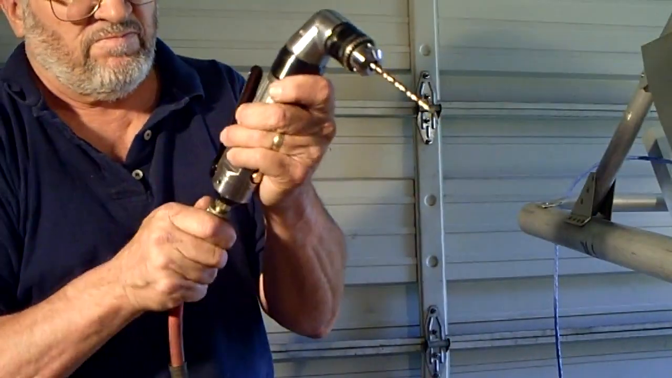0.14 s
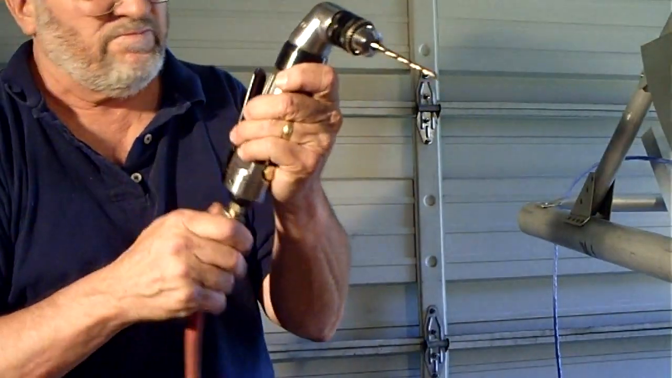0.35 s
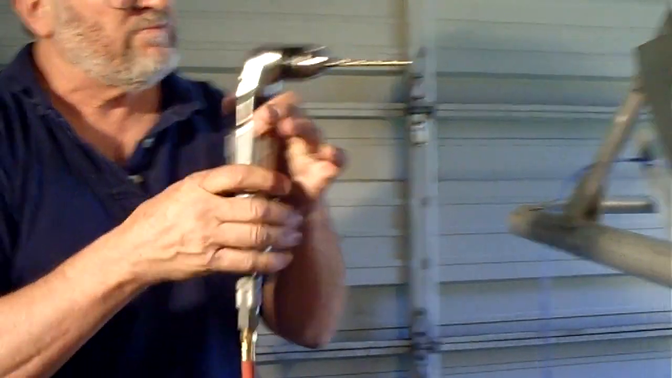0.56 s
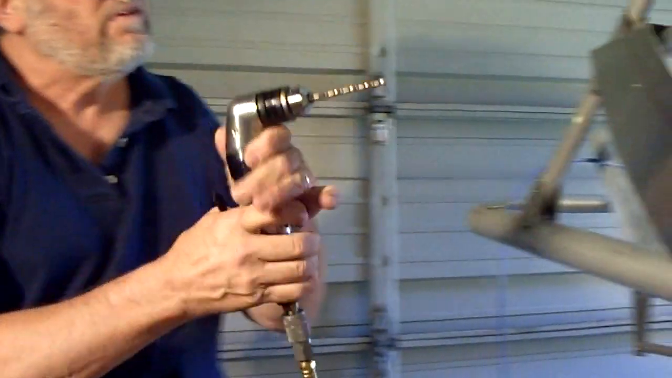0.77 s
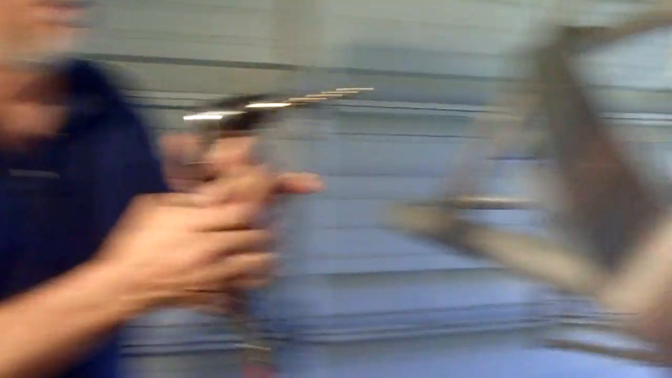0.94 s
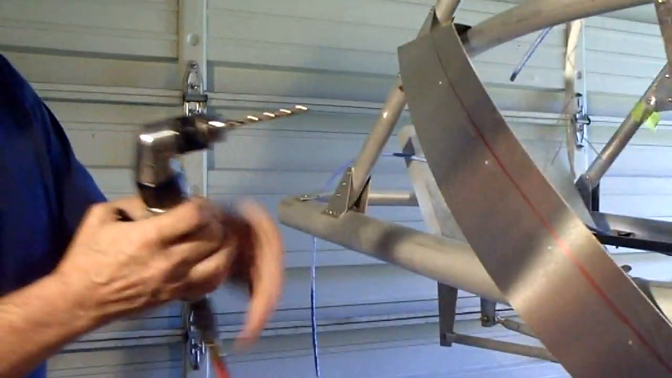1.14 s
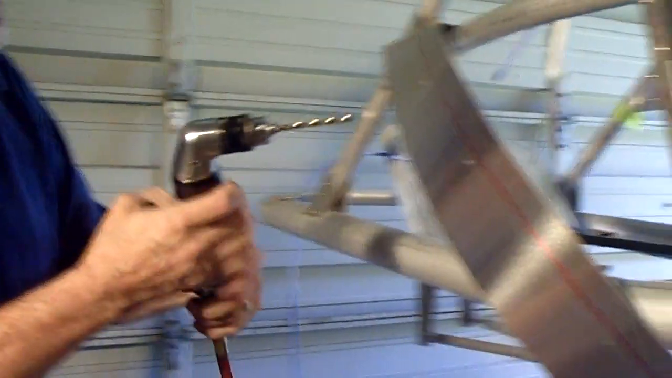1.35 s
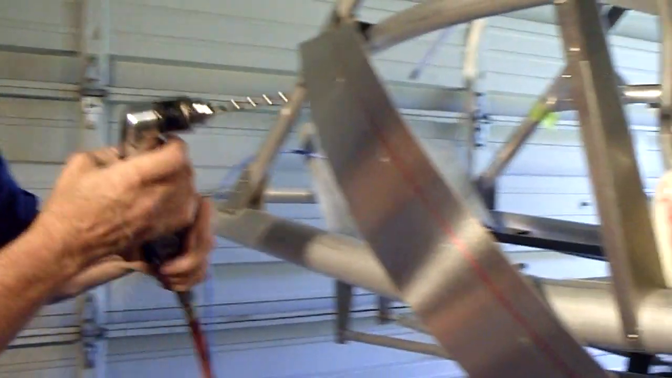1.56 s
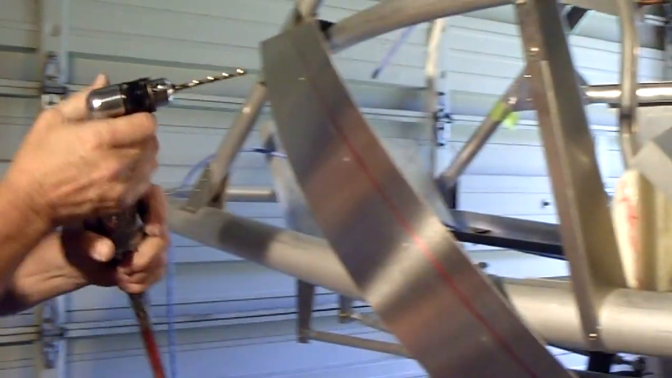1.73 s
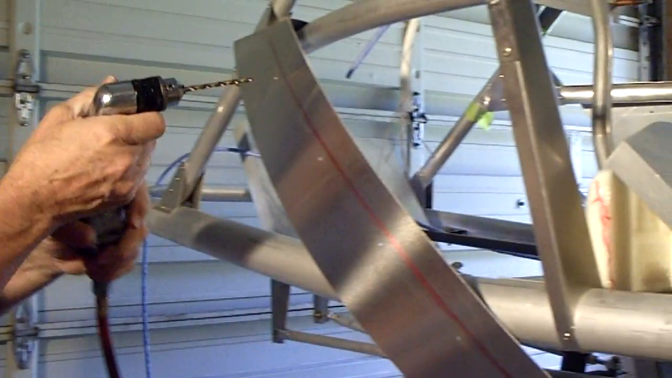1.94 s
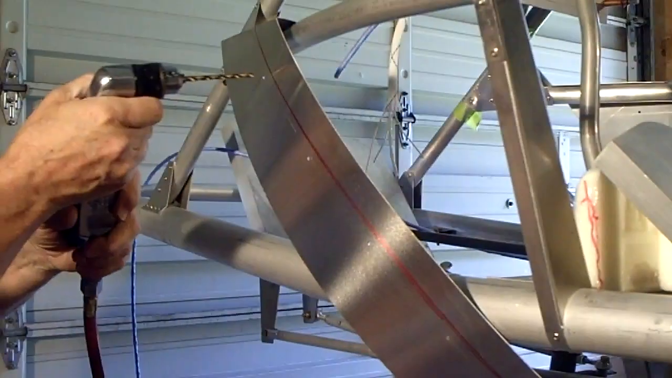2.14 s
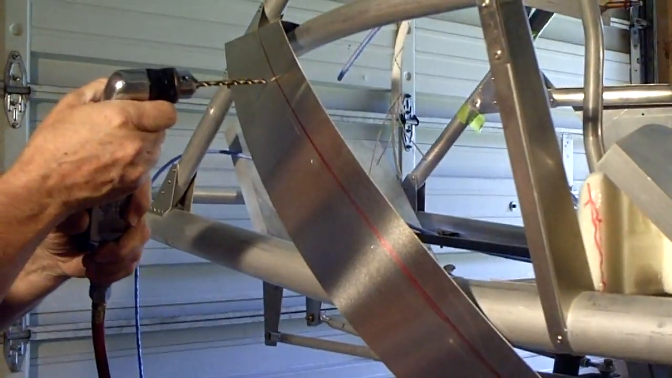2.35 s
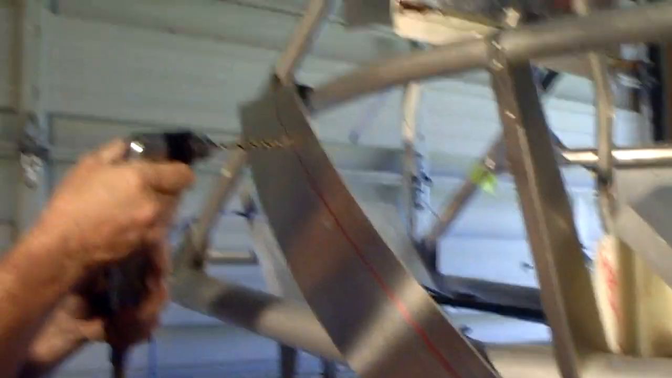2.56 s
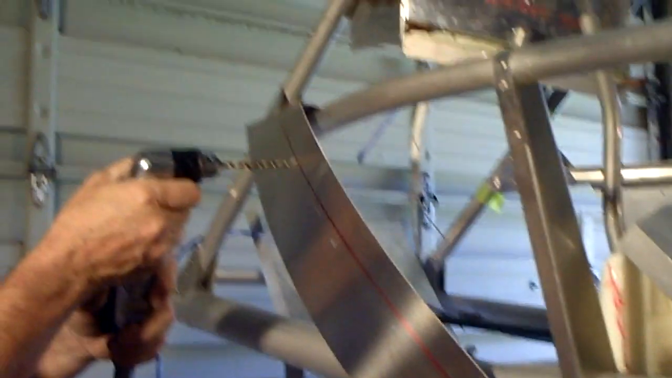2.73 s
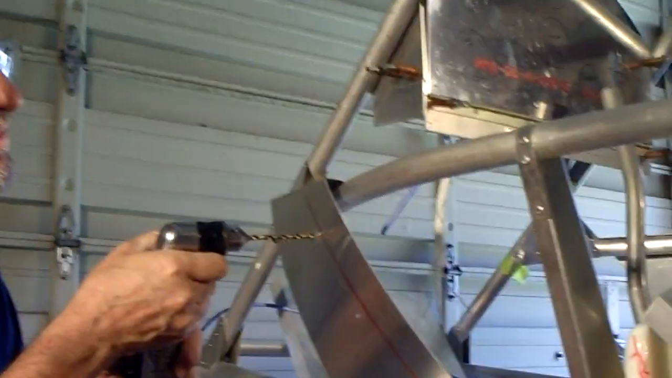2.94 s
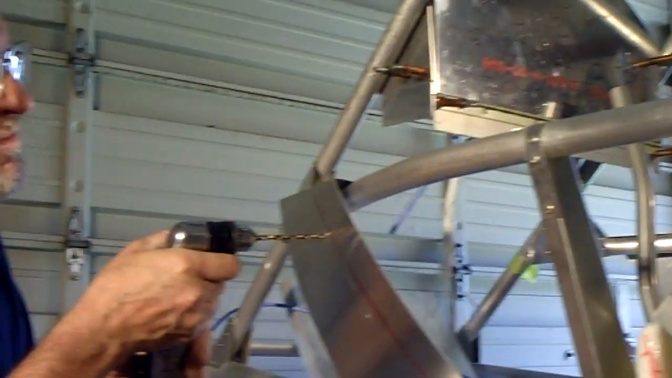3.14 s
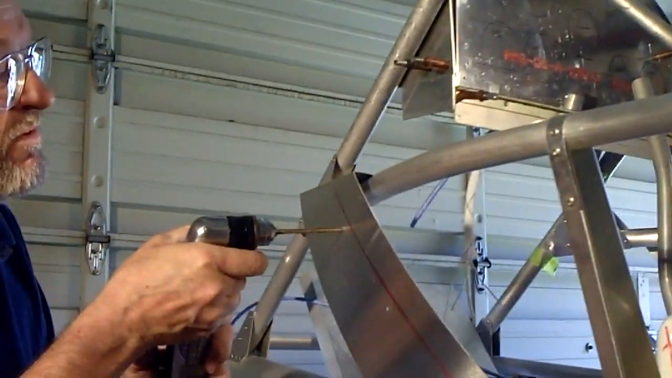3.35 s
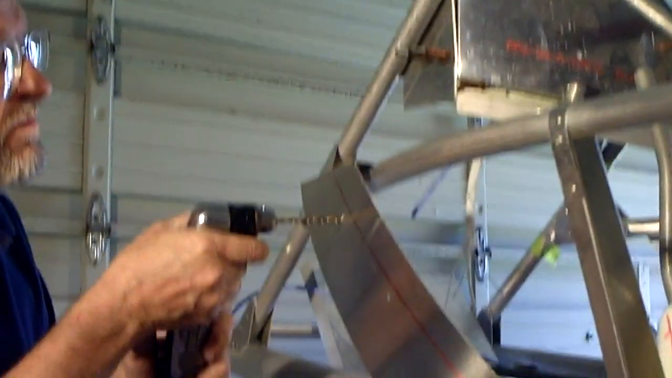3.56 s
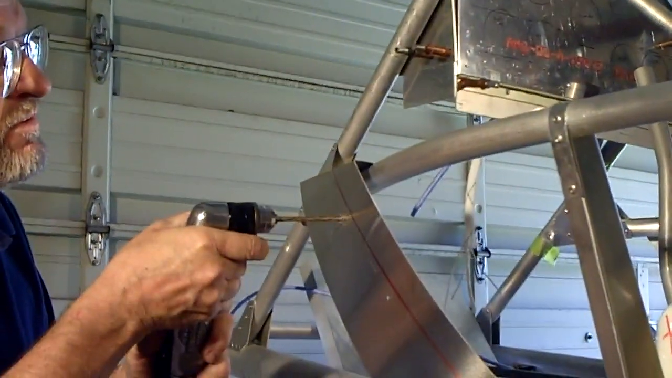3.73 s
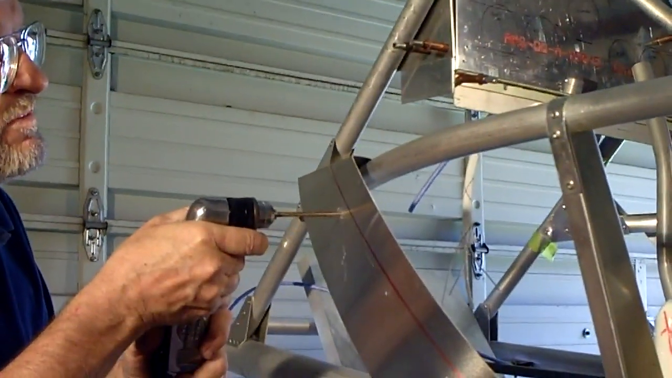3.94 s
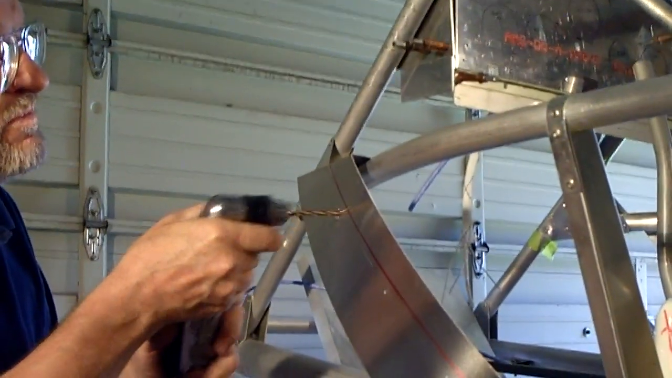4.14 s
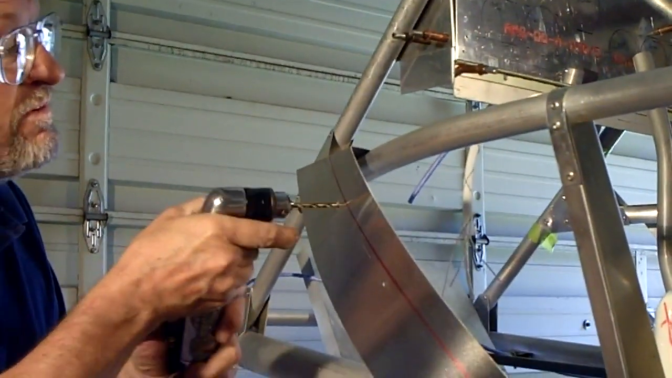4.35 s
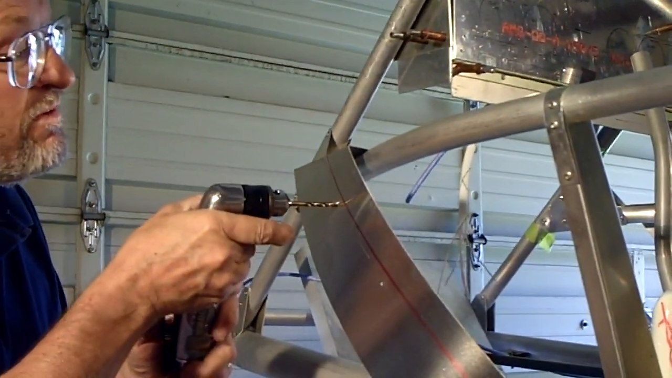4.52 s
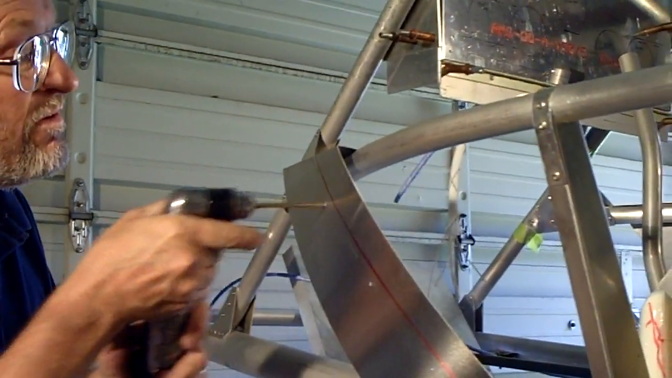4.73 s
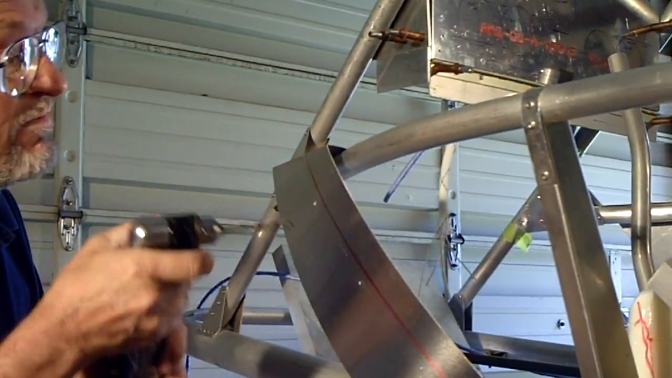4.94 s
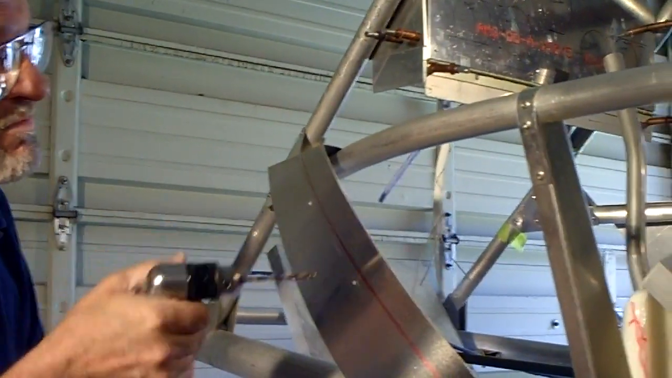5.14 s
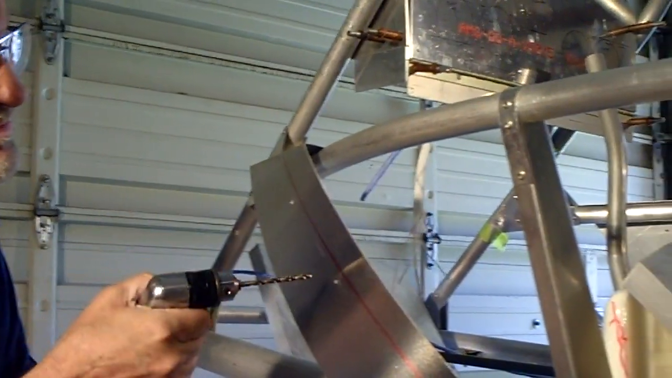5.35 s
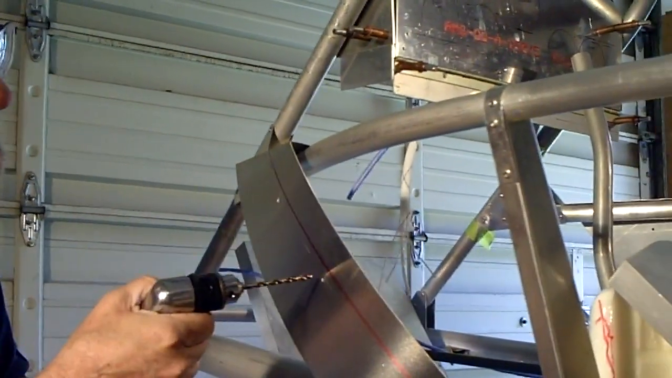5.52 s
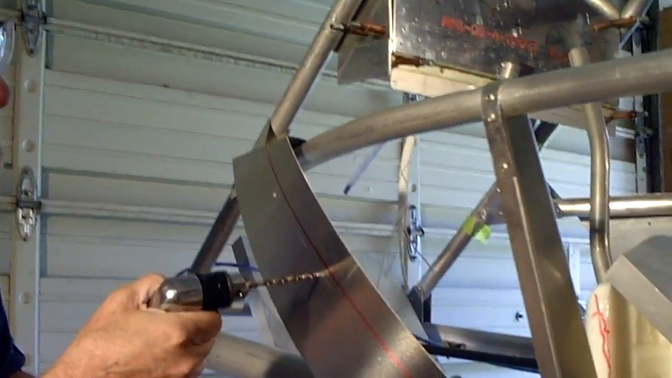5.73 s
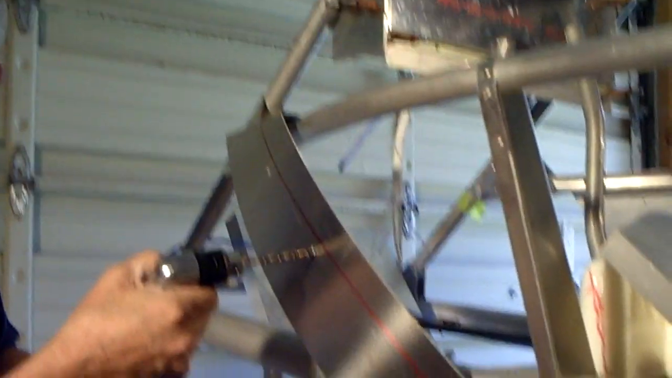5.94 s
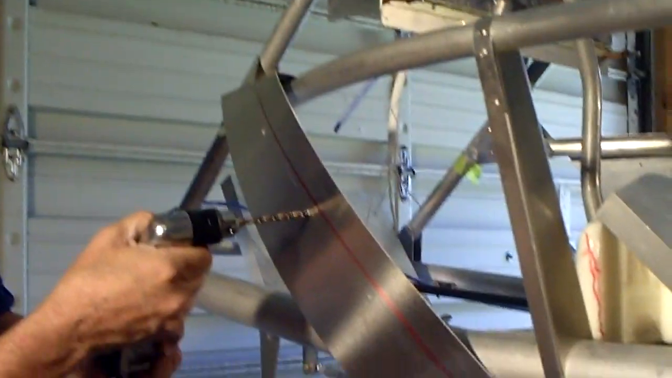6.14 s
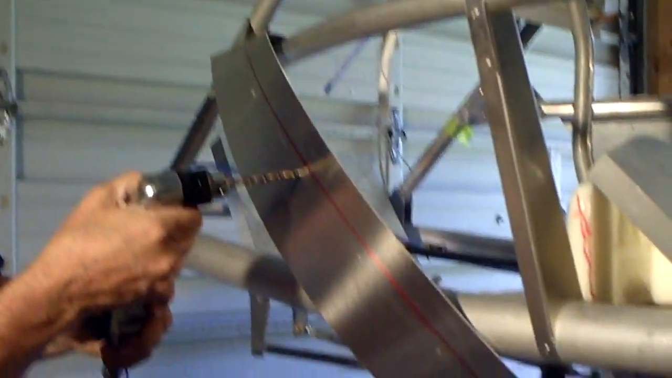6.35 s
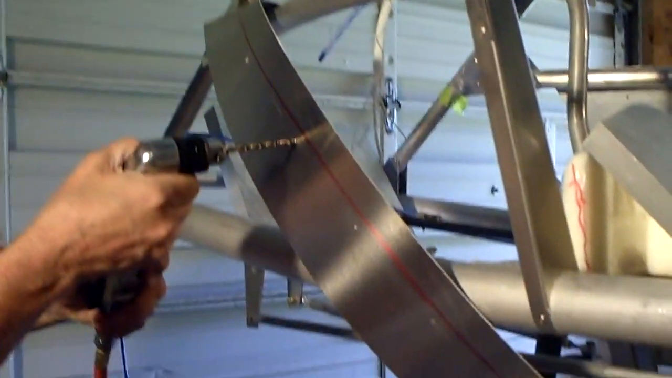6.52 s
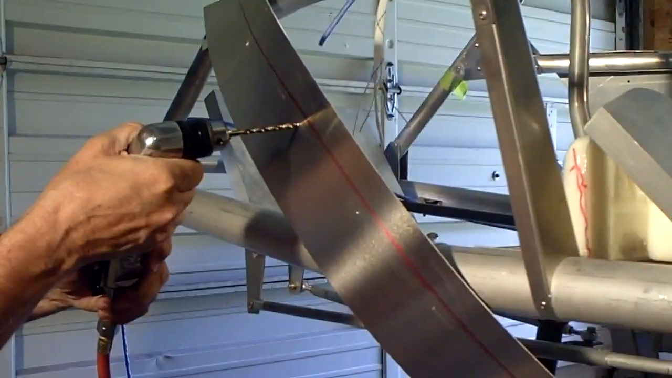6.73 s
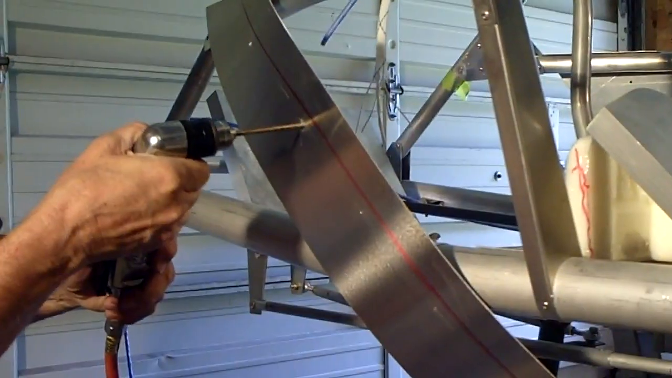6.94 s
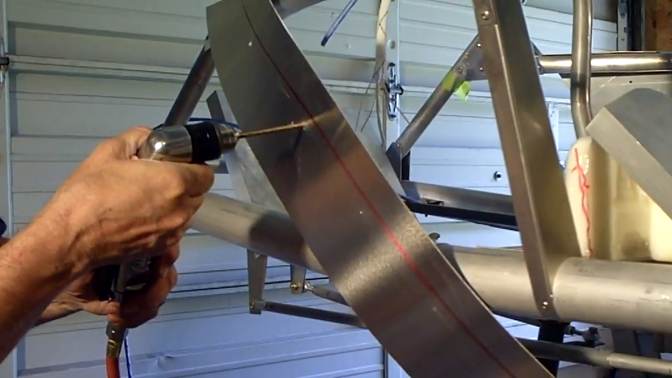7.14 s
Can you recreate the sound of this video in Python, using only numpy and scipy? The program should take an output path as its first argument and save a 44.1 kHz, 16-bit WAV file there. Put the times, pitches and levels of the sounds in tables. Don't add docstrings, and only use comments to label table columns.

```python
import sys
import numpy as np
from scipy import signal
from scipy.fft import rfft, irfft
from scipy.io import wavfile
from scipy.ndimage import uniform_filter1d

SR = 44100
rng = np.random.default_rng(int(sys.argv[2]) if len(sys.argv) > 2 else 0)


def makeup_ratio(level_db):
    decades = np.asarray(level_db, float) / 20
    return 10 ** decades


def master(y):
    cut = np.clip(np.atleast_2d(y).T, -1, 1)
    pcm = np.round(cut * 32767)
    wavfile.write(sys.argv[1], SR, pcm.astype(np.int16))


N = 316638
TIME = np.arange(N) / SR

# press t/s, release t/s, squeeze/s per 20 dB, spin-up chuff/dB, run-down chuff/dB
TRIGGER = [
    (3.222, 3.418, 0.021, -12, -5.5),
    (3.625, 4.361, 0.01, -12, -4.5),
    (4.575, 4.774, 0.0169, -12.5, -5),
    (6.811, 7.3, .009, -12, -5),
]
# t/s, vane rate f/Hz, tone level/dB, whine level/dB
SPEED = [
    [(3.28, 1060, -25, -16), (3.33, 1050, -23.5, -17), (3.374, 1034, -23.5, -19.5), (3.415, 1001, -24, -21)],
    [(3.69, 1024, -26.5, -20), (3.762, 1005, -21.5, -17.5), (3.812, 986.2, -29, -21.5),
     (3.862, 968.9, -25, -19.5), (3.96, 948.3, -20.5, -21), (4.01, 942, -25, -24), (4.1, 932.1, -22, -24),
     (4.24, 972, -27, -22), (4.355, 966, -26, -21)],
    [(4.63, 1056, -25, -17.5), (4.714, 1056, -24, -17), (4.77, 1025, -27, -22)],
    [(6.87, 1068, -18.5, -23), (6.95, 1044, -21, -21.5), (7.062, 996.5, -26, -18), (7.12, 984, -30, -19),
     (7.18, 982, -30, -20)],
]
SNAG_S = 4.139
FULL_OPEN_S, SHUT_S = .012, .008


def rms_one(x):
    return x / np.sqrt(np.mean(x ** 2) + 1e-20)


def at_hz(points, hz):
    point_hz, point_db = np.transpose(points)
    return np.interp(np.log(hz), np.log(point_hz), point_db)


def drift(rate):
    r = np.exp(-80 * np.pi * rate / SR)
    slow = signal.lfilter([1], [1, -2 * r, r * r], rng.standard_normal(N // 40 + 2002))[2000:]
    return np.interp(np.arange(N) / 40, np.arange(len(slow)), rms_one(slow))


def resonance(x, hz, width_hz):
    r = np.exp(-np.pi * width_hz / SR)
    poles = [1, -2 * r * np.cos(2 * np.pi * hz / SR), r * r]
    return signal.lfilter(np.array([1, 0, -1]) * (1 - r * r) / 2, poles, x)


def ring(clicks, hz, t60):
    r, w = makeup_ratio(-60 / (t60 * SR)), 2 * np.pi * hz / SR
    return signal.lfilter([0, np.sin(w)], [1, -2 * r * np.cos(w), r * r], clicks + 1e-18)


def coloured(spectrum, patchy_db):
    hz = np.maximum(np.arange(N // 2 + 1) * SR / N, 1)
    steady = irfft(rfft(rng.standard_normal(N)) * makeup_ratio(at_hz(spectrum, hz)), N)
    return rms_one(steady * makeup_ratio(patchy_db * drift(32)))


def struck(rows, t60):
    out = np.zeros(N)
    for s, db, *_ in rows:
        at = round(s * SR)
        out[at:at + SR // 4] += makeup_ratio(db - 60 * TIME[:SR // 4] / t60) * rng.standard_normal(SR // 4)
    return out


def bursts(rows):
    mixed = np.zeros(N)
    for s, db, hz, t60 in rows:
        puff = struck([(s, db)], max(t60, .005))
        mixed += 2.5 * resonance(puff, hz, 0.5 * hz) + .06 * puff
    return signal.sosfilt(signal.butter(4, 10000, fs=SR, output="sos"), mixed)


def swell(start, end, db, rise_s, fall_s):
    return db - 20 * np.maximum(np.maximum((start - TIME) / rise_s, (TIME - end) / fall_s), 0)


def loudest(levels_db):
    return makeup_ratio(np.maximum(np.max(levels_db, axis=0), -150))


def strokes(rows):
    return loudest([swell(s, s, db, rise, fall) for s, db, rise, fall in rows])


def background():
    # f/Hz, level/dB per Hz
    floor = [(12, -36), (20, 0.5), (85, -14), (120, -2.5), (166, -21), (235, -5.5), (262, -20.5),
             (292, -15.5), (371, -18.5), (485, -20), (3930, -36), (7880, -36), (12100, -44), (15700, -76.5),
             (22000, -120)]
    floor_db = -58
    # f/Hz, level/dB rms
    hum_lines = [(59.2, -64), (118.4, -65), (231.5, -64), (290.7, -73.5), (7585, -76.5)]
    hum = np.zeros(N)
    for hz, db in hum_lines:
        hum += np.sqrt(2) * makeup_ratio(db + 1.0 * drift(7.1)) * np.sin(2 * np.pi * hz * TIME)
    return makeup_ratio(floor_db) * coloured(floor, patchy_db=1.1) + hum


def workshop(x):
    # f/Hz, t60/s, tail level/dB
    walls = [(100, 0.87, -0.5), (400, 0.37, -1), (930, .4, 1), (1600, 0.36, -4.5), (2570, 0.45, 1),
             (5002, 0.37, -2.5), (8100, 0.43, 1.5), (12000, 0.16, 0.5)]
    room_db = -12
    wall_hz, t60, tail_db = np.transpose(walls)
    edges = 20 * 2 ** np.arange(1.5, 9.6, .5)
    t = TIME[:SR * 6 // 10]
    tail = np.zeros((2, len(t)))
    for low, high in zip(edges, edges[1:]):
        half_octave = signal.butter(2, [low, high], "band", fs=SR, output="sos")
        band = signal.sosfilt(half_octave, rng.standard_normal((2, len(t))))
        log_hz = np.log(low * high) / 2
        start_db = np.interp(log_hz, np.log(wall_hz), tail_db)
        tail += band * makeup_ratio(start_db - 60 * t / np.interp(log_hz, np.log(wall_hz), t60))
    tail *= np.clip((t - .004) / .012, 0, 1)
    blend_phase = 2 * np.pi * np.cumsum(40 * drift(30)) / SR
    paths = signal.fftconvolve([x * np.cos(blend_phase), x * np.sin(blend_phase)], tail, axes=1)[:, :N]
    return makeup_ratio(room_db) * paths.sum(axis=0) / np.sqrt(np.sum(tail[0] ** 2))


def handling():
    # t/s, peak level/dB, centre f/Hz, t60/s
    knocks_and_clicks = [(0.269, -33.5, 785, 0.12), (0.59, -44.5, 1770, 0.12), (0.754, -49, 2970, 0.12),
                         (1.579, -41, 510, 0.12), (1.732, -40, 1080, 0.12), (1.77, -46, 2750, 0.12),
                         (1.919, -51.5, 1640, 0.12), (2.416, -43, 1500, 0.12), (2.439, -41, 533, 0.12),
                         (2.699, -55, 1307, 0.12), (2.852, -45, 534, 0.12), (2.955, -49.5, 1277, 0.12),
                         (5.856, -43.5, 1290, 0.12), (6.163, -35, 854, 0.13), (6.217, -37, 908, 0.17),
                         (6.289, -47.5, 1565, 0.12),
                         (0.5144, -44, 5250, 0.058), (0.684, -52, 3430, 0.038), (0.719, -50, 4090, 0.077),
                   (1.2534, -33, 6960, 0.05)]
    # t/s, level/dB, rise/s and fall/s per 20 dB
    rubs = [(0.7, -57.5, .4, .2), (0.755, -59, .02, .06), (0.844, -47, .06, .045), (0.894, -45, .01, .3),
            (1.074, -42, .11, .065), (1.16, -59, .02, .25), (1.256, -50, .012, .25), (1.772, -60, .3, .035),
            (1.918, -64.5, .04, .06), (2.424, -59, .1, .3), (2.722, -64, .4, .03), (2.97, -69, .025, .03),
            (5.862, -59.5, .013, .08), (6.064, -66, .13, .13), (6.164, -61, .015, .2),
            (6.225, -58, .2, .17)]
    # f/Hz, level/dB per Hz
    rub_colour = [(240, -38), (400, -8), (717, -13.5), (1340, -6.5), (1730, -2), (2240, -22), (3240, -13),
                  (7190, -20.5), (9690, -20.5), (12000, -45), (15600, -75), (22000, -120)]
    ticks = makeup_ratio(-6) * bursts(knocks_and_clicks)
    return ticks + strokes(rubs) * coloured(rub_colour, patchy_db=1.5)


def slaps():
    # t/s, peak level/dB, crack level/dB
    hits = [(0.819, -29.5, -16), (0.892, -18, -28.5), (0.948, -19.5, -29), (1.0, -25, -21),
            (1.056, -25, -14.5), (1.274, -17, -24)]
    # f/Hz, width/Hz, level/dB
    hose_modes = [(309, 96, -4.5), (446, 47, -2), (668, 177, 2.5), (1080, 117, 0), (1650, 230, -13),
                  (2130, 260, -25)]
    blows = struck(hits, 0.077) * makeup_ratio(-6.0)
    for s, db, _ in hits:
        blows[round(s * SR)] += 5.6 * makeup_ratio(db)
    body = sum(makeup_ratio(db + 18) * resonance(resonance(blows, hz, 2 * w), hz, w) for hz, w, db in hose_modes)
    return body + bursts([(s, db + crack_db - 4, 3500, .05) for s, db, crack_db in hits])


def coupling():
    # t/s, level/dB
    blast_levels = [
        (0.0, -14),
        (0.1, -13),
        (0.13, -21),
    ]
    # f/Hz, level/dB per Hz
    blast_colour = [(35, -47), (60, -16.5), (463, -13), (881, -18.5), (1030, -3.5), (1310, -10.5),
                    (1470, -6.5), (2190, -13.5), (8870, -1.5), (10100, -1), (12100, -22), (15700, -51),
                    (22000, -120)]
    # t/s, peak level/dB
    snap = [(0.103, -5)]
    # t/s, level/dB, rise/s and fall/s per 20 dB
    seep_swells = [
        (0.284, -54, .004, 0.65),
        (4.914, -48.5, .03, 0.24),
    ]
    # f/Hz, width/Hz, level/dB
    seep_bands = [(2518, 1000, -1), (5400, 750, -1)]

    blast_t, blast_db = np.transpose(blast_levels)
    blast_gain = makeup_ratio(np.interp(TIME, blast_t, blast_db, -150, -150))
    blast = uniform_filter1d(blast_gain, 45) * coloured(blast_colour, patchy_db=-0.1)

    latch = bursts([(s, db, 900, .03) for s, db in snap])
    latch += 3.0 * resonance(struck(snap, .004), 830, 1800)

    white = rng.standard_normal(N)
    seep = rms_one(sum(makeup_ratio(db) * resonance(resonance(white, hz, w), hz, w) for hz, w, db in seep_bands))
    return blast + latch + strokes(seep_swells) * seep


def vane_hz():
    spin_up_s, coast_s = .0125, .042
    snag_hz, snag_in_s, snag_out_s = 155, .032, .043
    s, hz, *_ = np.concatenate(SPEED).T
    share = np.zeros(N)
    for on, off, *_ in TRIGGER:
        rush = -np.expm1(-np.maximum(TIME - on, 0) / spin_up_s)
        share += rush * np.exp(-np.maximum(TIME - off, 0) / coast_s)
    away = np.where(TIME < SNAG_S, (SNAG_S - TIME) / snag_in_s, (TIME - SNAG_S) / snag_out_s)
    dip = snag_hz * np.cos(np.pi / 2 * np.minimum(away, 1)) ** 2
    return (np.interp(TIME, s, hz) - dip) * share * (1 + .0015 * drift(44))


def throttle(fall_s):
    leak_db, leak_rise_s = -18, .006
    levels = []
    for on, off, squeeze, *_ in TRIGGER:
        is_open = on + FULL_OPEN_S
        levels.append(swell(is_open, off + SHUT_S, 0, squeeze, fall_s))
        levels.append(swell(is_open - 1.4 * squeeze, is_open, leak_db, leak_rise_s, fall_s))
    return np.max(levels, axis=0)


def sheet(phase):
    # f/Hz, level/dB, t60/s
    sheet_modes = [(111, -2.5, 0.1), (138.9, -5, 0.24), (174.7, -3.5, 0.37), (212.8, -8, 0.17),
                   (426.7, -9.5, 0.37), (518, -6.5, 0.16), (641, -12, 0.19), (1147, -9.5, 0.35),
                   (1630, -6.5, 0.1)]
    # t/s, low drumming level/dB, upper drumming level/dB, rise/s and fall/s per 20 dB
    bit = [(3.318, -29, -37, .12, 1.1), (3.45, -36, -34, .3, .04), (3.724, -31, -36, .3, .55),
           (3.922, -50, -30, .12, 0.1), (4.104, -50, -30, .25, 0.16), (4.3, -52, -33, .6, 0.86),
           (4.654, -52, -28, .04, 0.16), (4.79, -54, -40, .5, .1), (6.89, -34.5, -32.5, .07, 0.4),
           (7.09, -36, -29, 0.11, 0.3), (7.18, -32, -35, .25, .1)]
    # t/s, peak level/dB
    tip = [
        (2.416, -60),
        (2.43, -57.5),
    ]
    gear_ratio = 27.3
    turns = np.diff(np.floor(phase / (2 * np.pi * gear_ratio)), prepend=0) > 0
    bites = turns * makeup_ratio(1.2 * rng.standard_normal(N)) + 0.032 * rng.standard_normal(N)
    turning = makeup_ratio(throttle(0.055)) * bites
    low = turning * strokes([(s, db, rise, fall) for s, db, _, rise, fall in bit])
    upper = turning * strokes([(s, db, rise, fall) for s, _, db, rise, fall in bit])
    touch = resonance(makeup_ratio(-7) * struck(tip, 0.043), 640, 580)
    modes = sum(makeup_ratio(db) * ring(low if hz < 155 else upper + touch, hz, t60) for hz, db, t60 in sheet_modes)
    return makeup_ratio(1.5) * signal.sosfilt(signal.butter(4, 95, "high", fs=SR, output="sos"), modes)


def drill_levels(hz):
    hiss_db, chuff_db = -30.5, -29
    chuff_db_per_hz, chuff_wander_db = 0.0872, 3.0
    seat_s, seat_rise_s, sing_fall_s, hiss_fall_s = .06, .055, .12, .13
    spin_hold_s, spin_chuff_s, dump_rise_s, dump_hold_s, dump_fall_s = .004, .085, 0.0053, .01, 0.076
    dregs_db, dregs_fall_s = -5, .14
    snag_chuff_db, snag_hiss_db, snag_swell_s = -14.5, -24, 0.068

    seats, chuffs = [], []
    for on, off, squeeze, start_db, stop_db in TRIGGER:
        is_open, shut = on + FULL_OPEN_S, off + SHUT_S
        dumped = shut + dump_hold_s
        seats.append(swell(on + seat_s, off, 0, seat_rise_s, sing_fall_s))
        chuffs.append(swell(is_open, is_open + spin_hold_s, start_db, squeeze, spin_chuff_s))
        chuffs.append(swell(shut, dumped, stop_db, dump_rise_s, dump_fall_s))
        chuffs.append(swell(shut, dumped, stop_db + dregs_db, dump_rise_s, dregs_fall_s))
    seated = np.max(seats, axis=0)

    running = chuff_db + throttle(dump_fall_s) + chuff_wander_db * drift(12)
    running += chuff_db_per_hz * (np.maximum(hz, 900) - 1000)
    snag = swell(SNAG_S, SNAG_S, 0, snag_swell_s, snag_swell_s)
    chuff = loudest([running, snag + snag_chuff_db] + chuffs)
    hiss = loudest([hiss_db + throttle(hiss_fall_s), snag_hiss_db + snag / 2])
    s, _, tone_db, whine_db = np.concatenate(SPEED).T
    tone = makeup_ratio(np.interp(TIME, s, tone_db) + seated)
    whine = makeup_ratio(np.interp(TIME, s, whine_db) + seated)
    return chuff, tone, whine, hiss


def drill(hz, phase):
    # t/s, peak level/dB
    valve = [(3.229, -3), (3.637, -7), (4.583, -0.5), (6.819, -1.5)]
    # f/Hz, width/Hz, level/dB
    pipe = [(530, 200, -10.5), (808.6, 170, -7.5), (1290, 110, 2), (1611, 130, 5)]
    # multiple of vane rate, level/dB
    vanes = [(1, 6.5), (2, -5), (3, -1), (4, -3), (5, -3.5), (6, -4.5), (7, -13.5), (8, -12), (9, -15.5),
             (10, -17.5), (11, -28)]
    # f/Hz, level/dB per Hz
    hiss_colour = [(150, -35), (250, -13.5), (357, -18.5), (519, -8.5), (662, -12.5), (993, -2), (1370, -4),
                   (1570, -3), (3090, -8), (3640, -10.5), (7440, -11.5), (9800, -13), (12100, -36),
                   (15700, -64), (22000, -120)]
    chuff, tone, whine, hiss = drill_levels(hz)

    puffing = chuff * rng.standard_normal(N) + makeup_ratio(2.0) * struck(valve, 0.041)
    puffing = signal.sosfilt(signal.butter(2, 4000, fs=SR, output="sos"), puffing)
    spinning = np.minimum(hz / 480, 1) ** 2.5 * makeup_ratio(1.6 * drift(150))
    vane_pulses = sum(np.cos(k * phase) * makeup_ratio(-2.5 * k) for k in range(1, 7))
    pulses = chuff * spinning * vane_pulses + .4 * puffing
    exhaust = sum(makeup_ratio(db) * resonance(resonance(pulses, f, 2.6 * w), f, w) for f, w, db in pipe)
    leak = makeup_ratio(-8.5) * resonance(pulses, 400, 250) + makeup_ratio(-4) * resonance(puffing, 920, 1200)

    sealed = np.minimum(hz / 935, 1) ** 9.1
    stack = np.zeros(N)
    for k, db in vanes[1:]:
        wavering = makeup_ratio(db + 3.5 * drift(10) + 2.4 * drift(70))
        stack += wavering * np.cos(k * phase + rng.uniform(0, 2 * np.pi))
    singing = sealed * (makeup_ratio(2.5) * tone * np.cos(phase) + makeup_ratio(-5) * whine * stack)

    air = coloured(hiss_colour, patchy_db=0.96) * (1 + .3 * np.cos(phase))
    return makeup_ratio(5.5) * exhaust + leak + singing + makeup_ratio(7.5) * hiss * air


def scene():
    hz = vane_hz()
    phase = 2 * np.pi * np.cumsum(hz) / SR
    near = handling() + coupling() + sheet(phase) + drill(hz, phase)
    hose = slaps()
    return (background() + workshop(near + makeup_ratio(-4) * hose) + hose + near)[None]


def low_pass(x):
    return signal.sosfilt(signal.butter(12, 12250, fs=SR, output="sos"), x)


def record(dry):
    heard = signal.sosfilt(signal.butter(4, 11500, fs=SR, output="sos"), dry)
    return low_pass(np.clip(heard, -.7, .7))


dry = scene()
out = record(dry)
master(out)
```